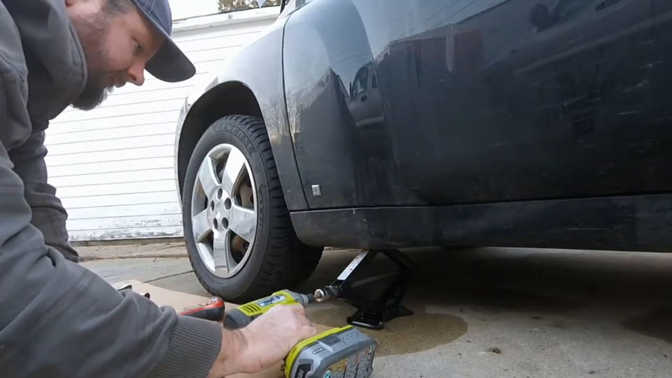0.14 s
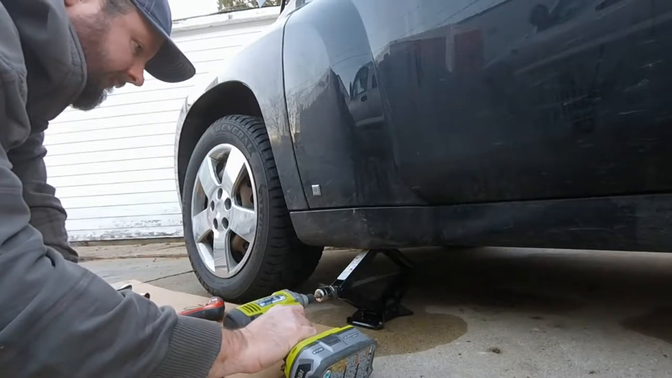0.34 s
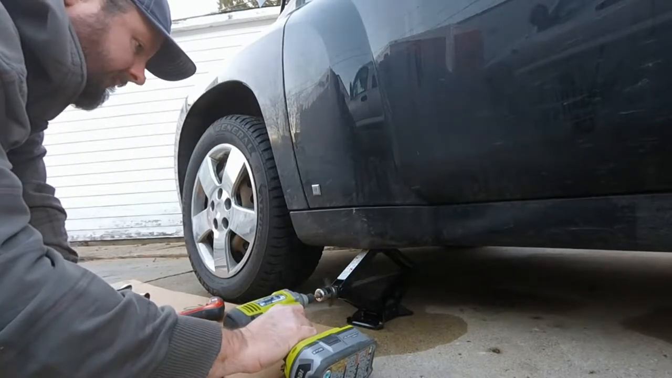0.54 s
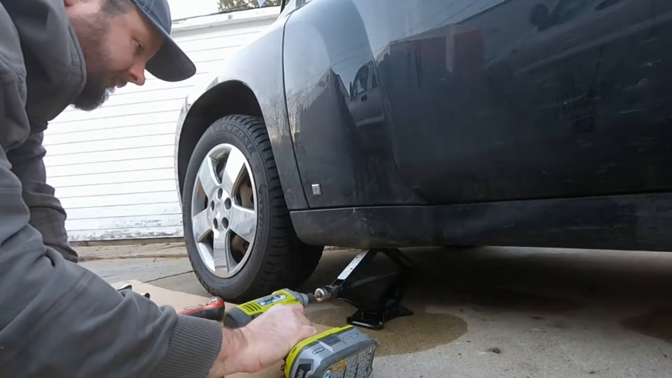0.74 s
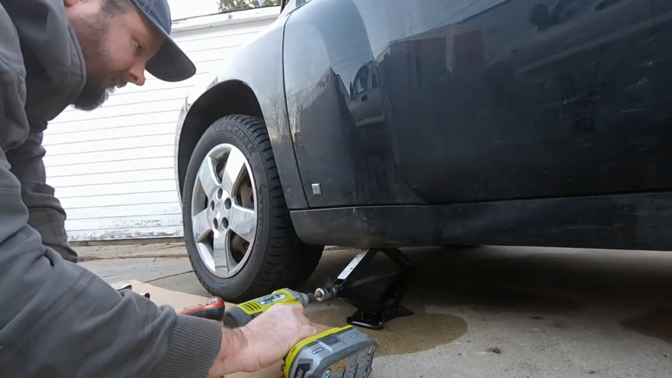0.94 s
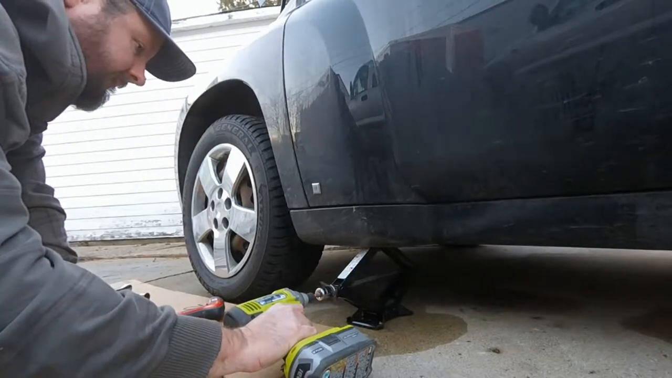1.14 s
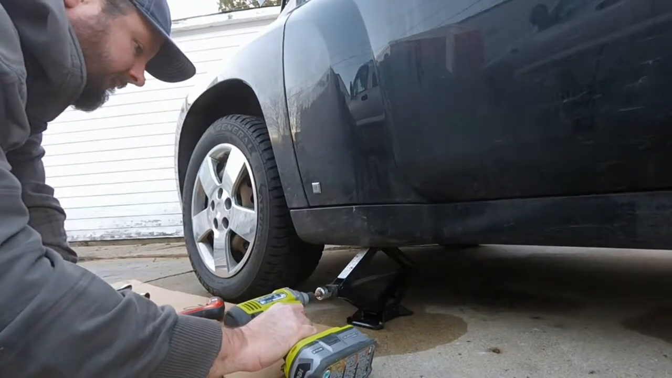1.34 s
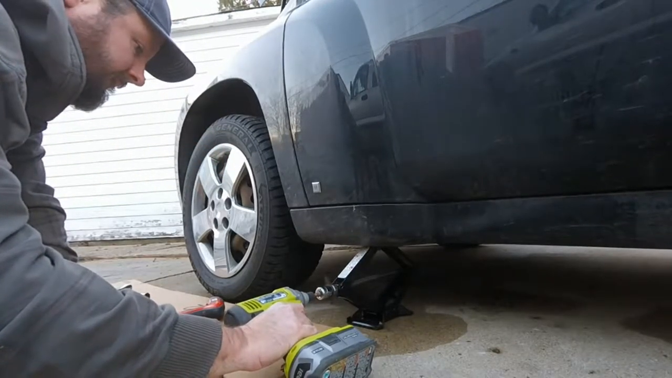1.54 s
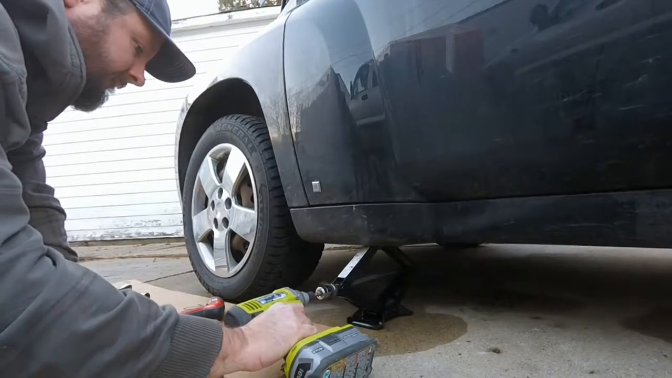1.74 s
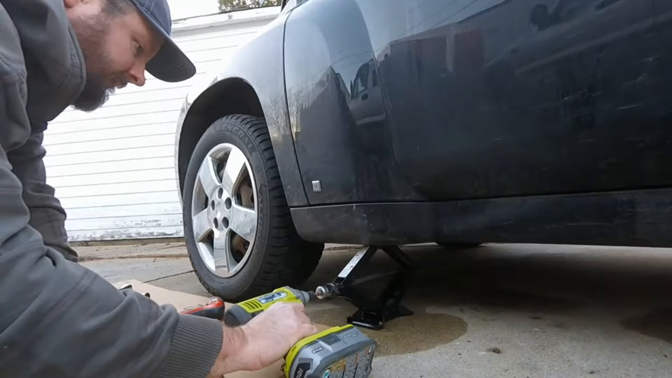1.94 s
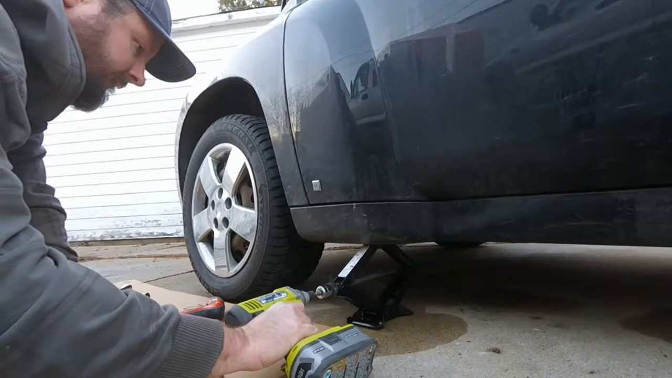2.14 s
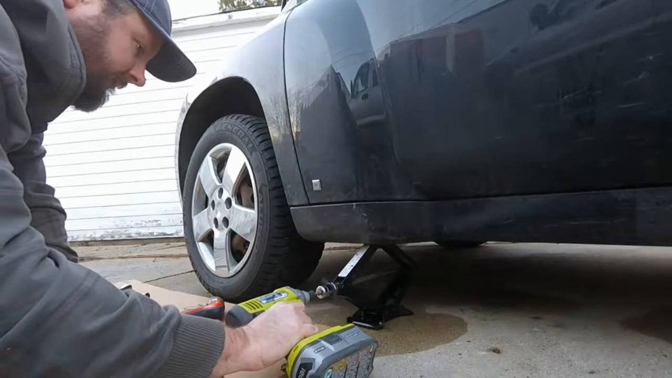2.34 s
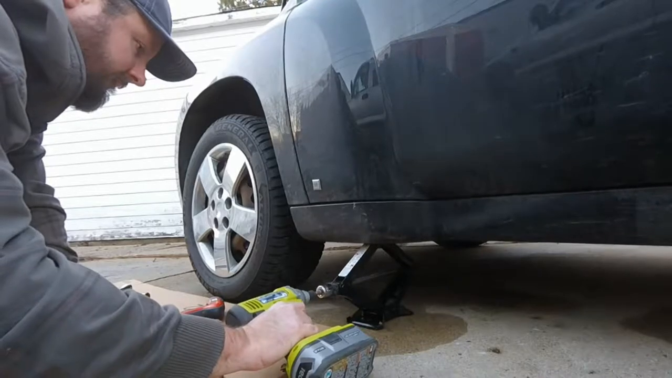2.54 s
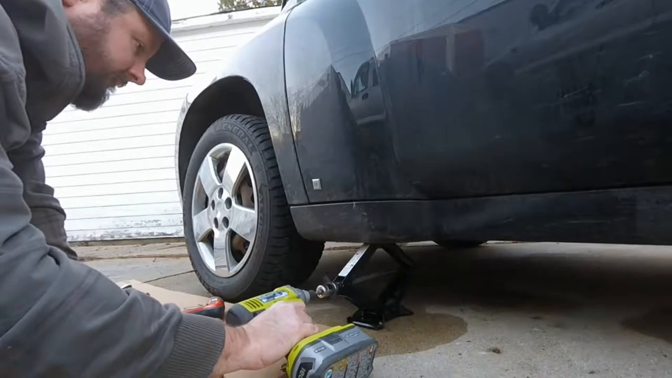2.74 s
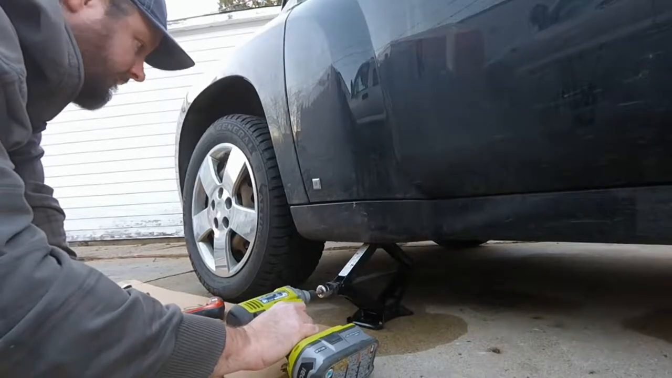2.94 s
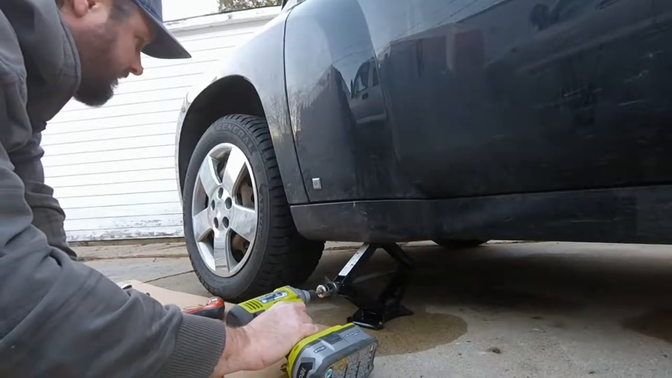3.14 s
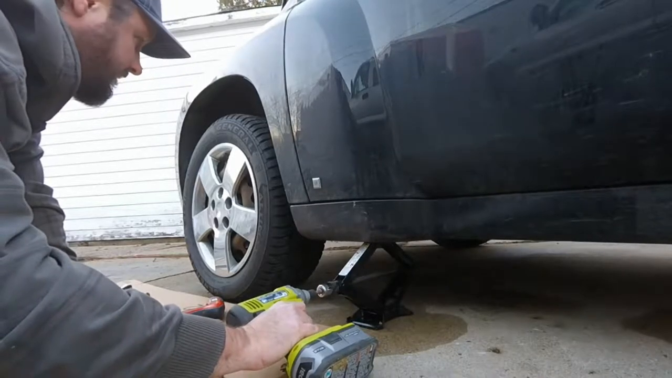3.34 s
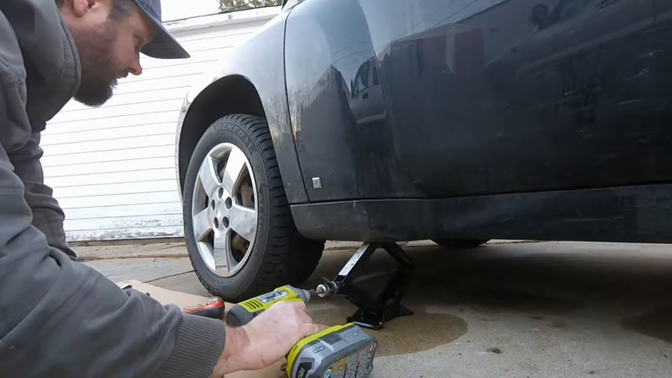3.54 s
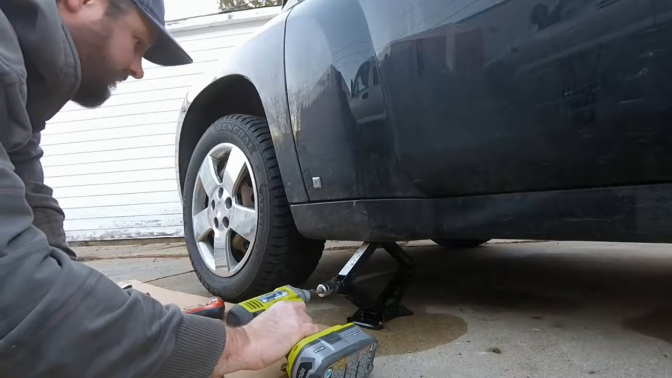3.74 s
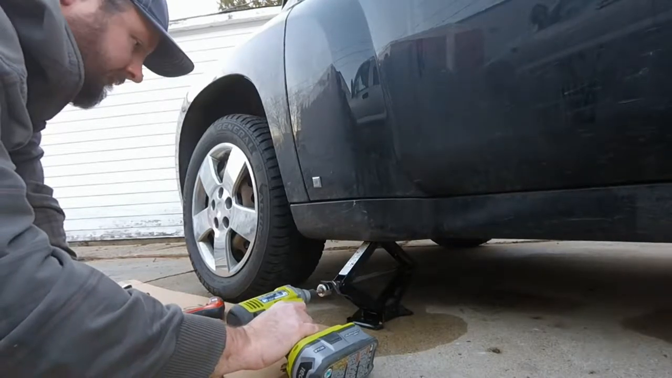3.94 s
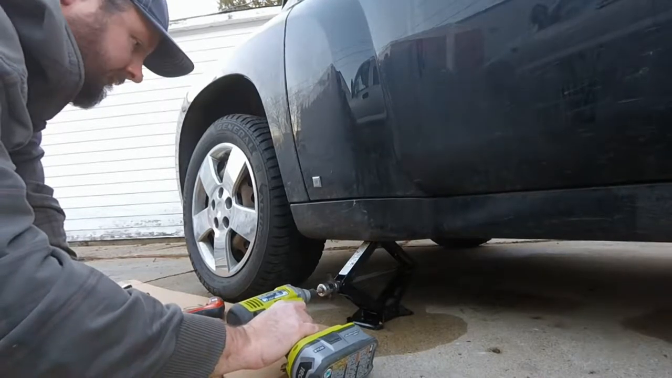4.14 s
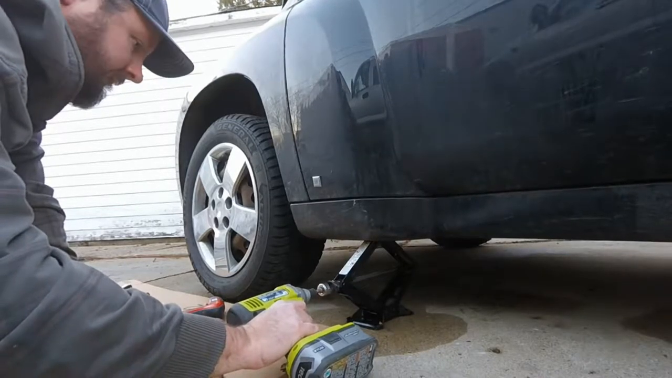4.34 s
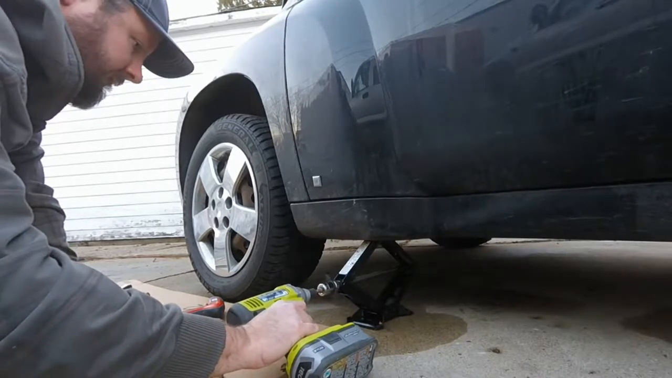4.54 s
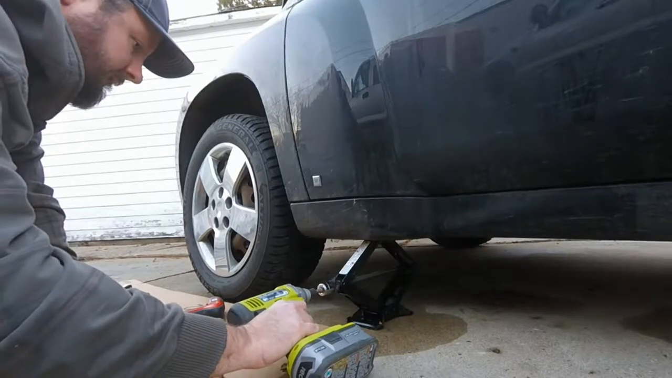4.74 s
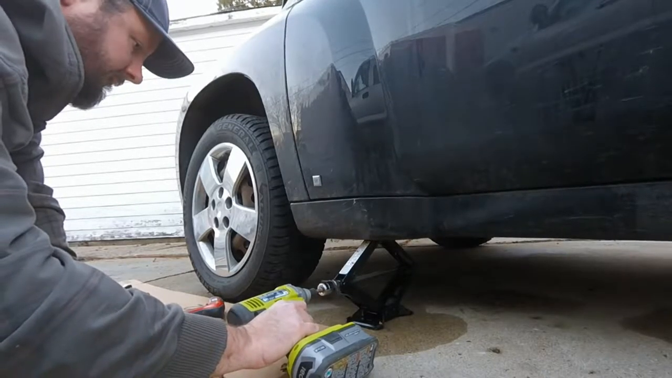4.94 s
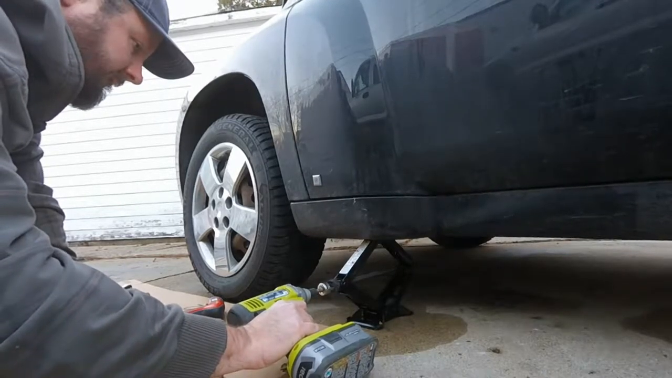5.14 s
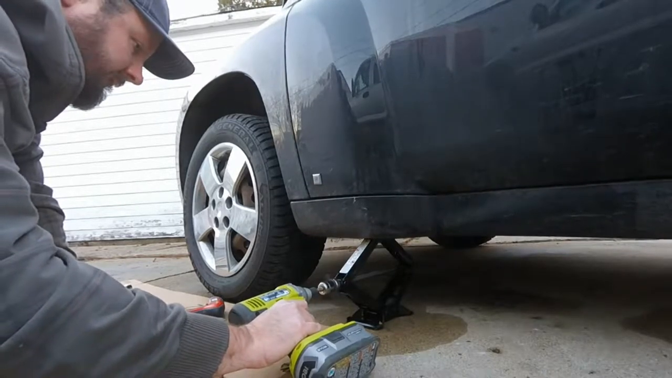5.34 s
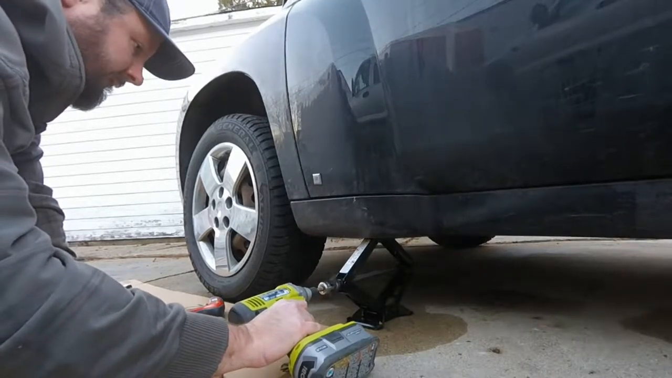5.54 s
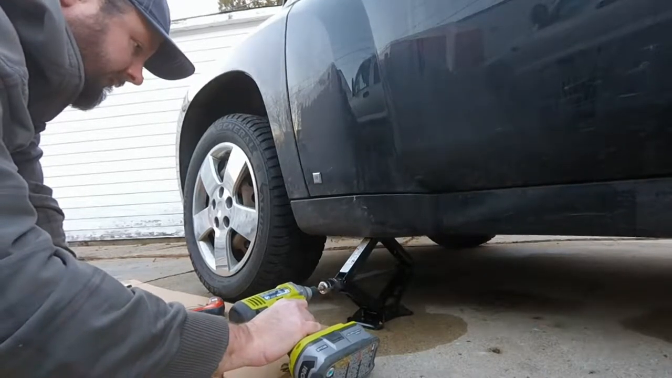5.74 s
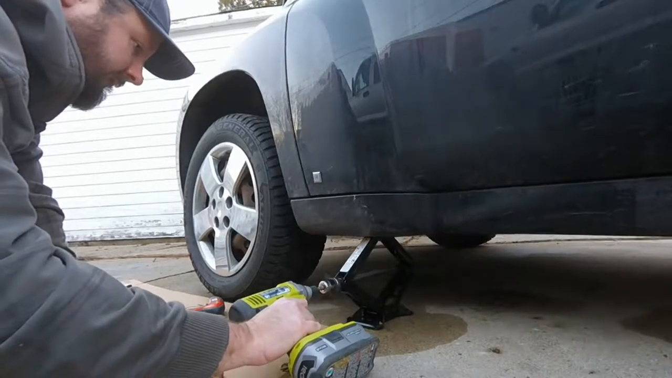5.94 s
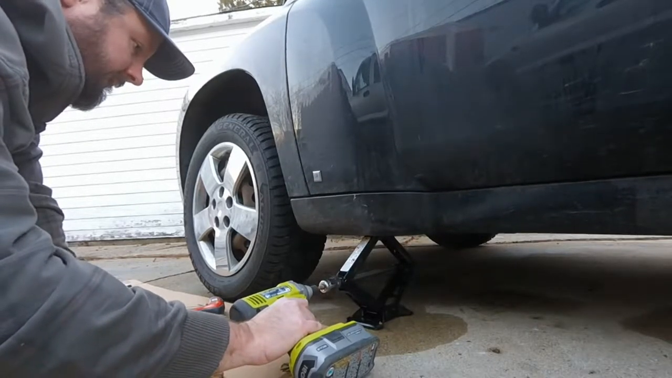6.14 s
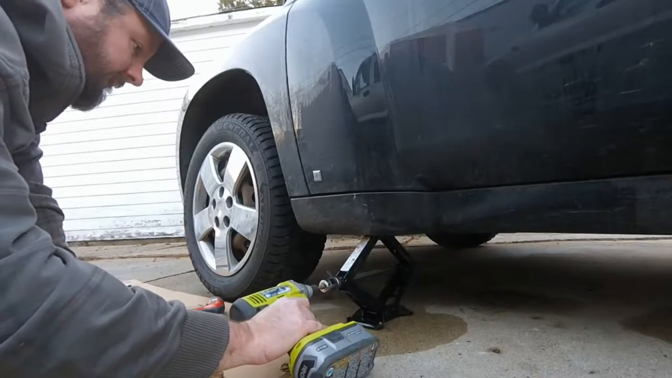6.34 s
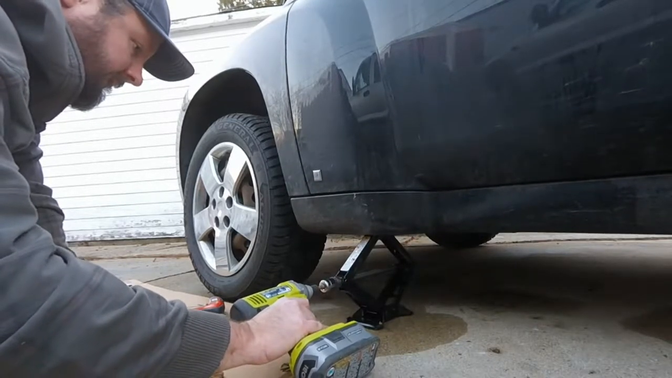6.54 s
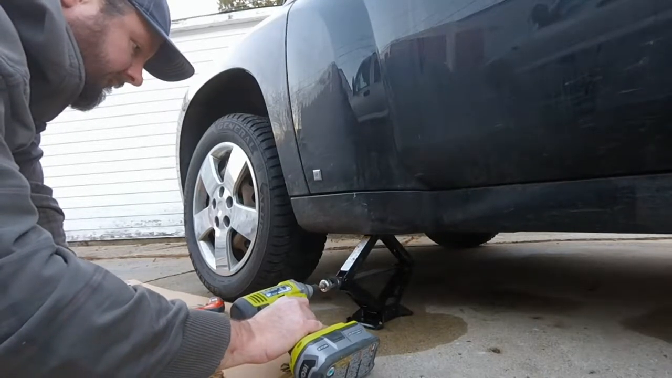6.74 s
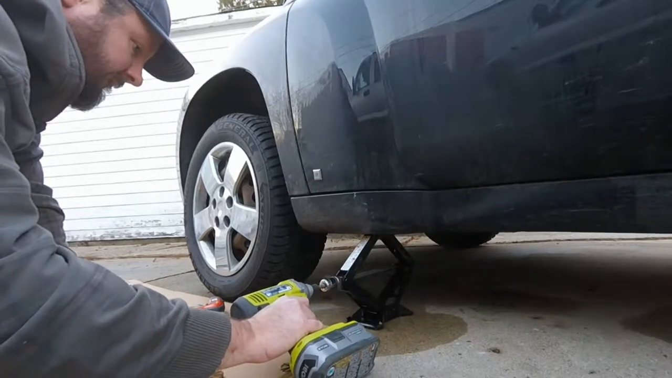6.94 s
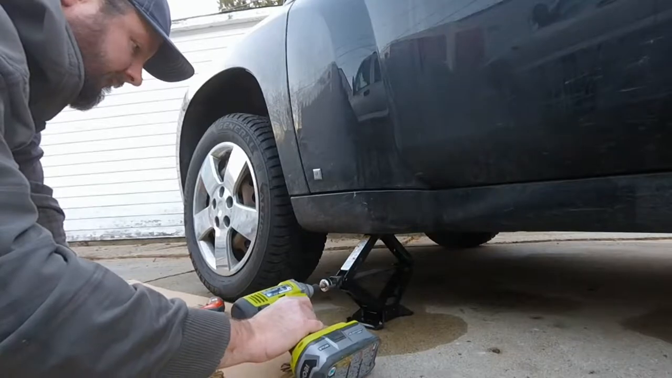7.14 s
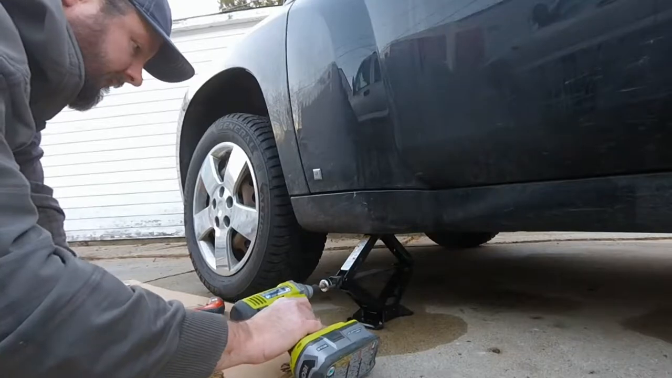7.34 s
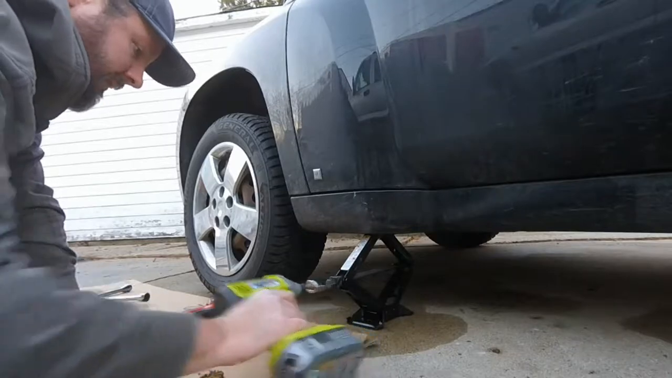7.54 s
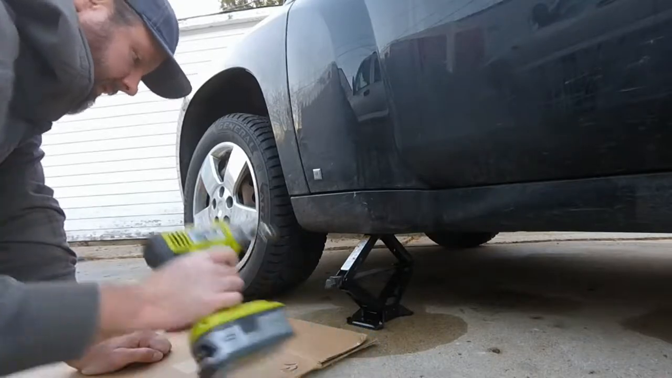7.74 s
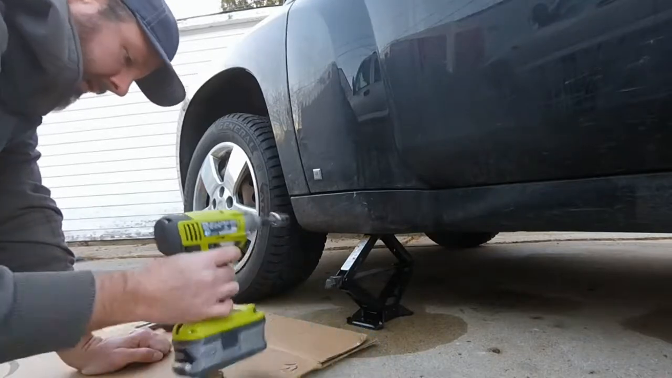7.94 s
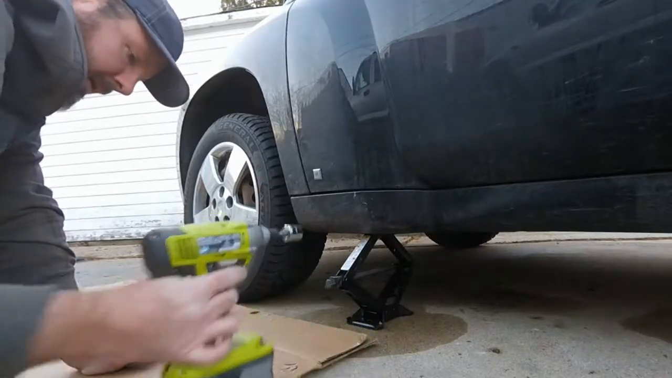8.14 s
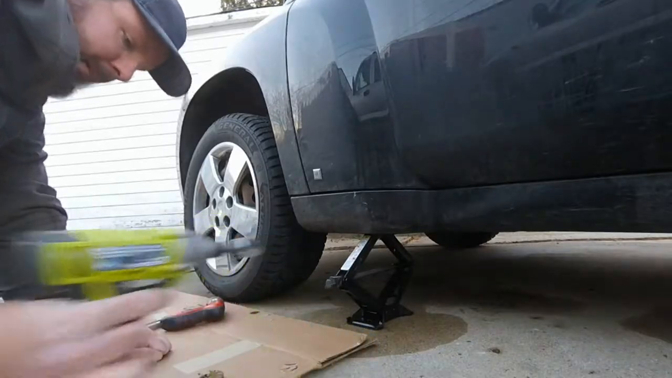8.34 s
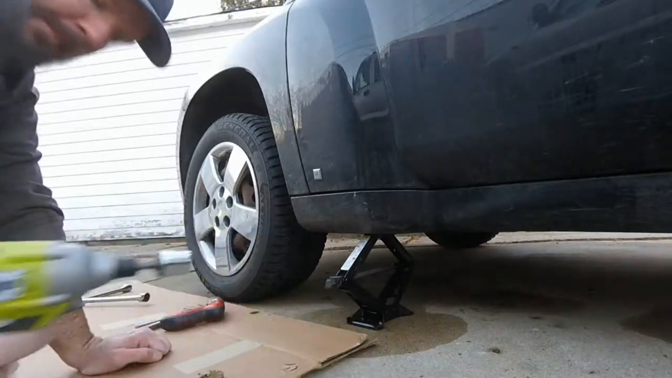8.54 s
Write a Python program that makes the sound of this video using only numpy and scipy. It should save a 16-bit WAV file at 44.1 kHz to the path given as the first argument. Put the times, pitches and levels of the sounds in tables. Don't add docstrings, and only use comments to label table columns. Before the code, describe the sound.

A cordless impact driver clacks slowly, tightens into steady metallic hammering, fires six fast rattling bursts, then stops, leaving wind thumps and faint traffic.

```python
import sys
import numpy as np
from scipy import signal
from scipy.fft import rfft, irfft
from scipy.io import wavfile
from scipy.ndimage import uniform_filter1d

SR = 44100
rng = np.random.default_rng(int(sys.argv[2]) if len(sys.argv) > 2 else 0)


def unload_audio(sound):
    columns = np.transpose(np.atleast_2d(sound))
    steps = np.round(np.clip(columns, -1, 1) * 32767)
    wavfile.write(sys.argv[1], SR, steps.astype(np.int16))


def magnitude_from_level(level_db):
    exponent = np.asarray(level_db, float) / 20
    return 10 ** exponent


N = 378819

# [t/s, level/dB]
SLOW_BLOWS = [(0.0492, -10), (0.1752, -11), (0.3002, -15), (0.4164, -12.5), (0.4899, -15.5),
              (0.5463, -13.5), (0.603, -15), (0.6555, -12), (0.7125, -14), (0.7663, -15.5), (0.821, -17.5)]
# [t/s, blows struck so far]
STEADY_RUN = [(0.8696, 0), (0.9774, 3), (1.076, 6), (1.592, 21), (1.6894, 24), (2.0531, 36), (2.2393, 42),
              (2.6276, 54), (3.3178, 75), (3.9153, 93), (4.5164, 111), (4.6188, 114), (5.1188, 129),
              (5.184, 131)]
# [t/s, level/dB, extra share reaching the jack/dB]
TICKS = [(0.005, -26, 3.5), (0.042, -20, -10), (0.124, -34, 4), (0.1606, -25.5, 4), (0.248, -40, 13),
         (0.284, -26, 0), (0.373, -26, 1), (0.4035, -23.5, 4), (0.464, -29, -24), (0.533, -22, -16),
         (6.58, -49, 7)]
# [t/s, height 0-1, ground thud/dB, sill tilt/dB per octave, sill boom/dB]
JACK_RISE = [(0, 0, 6, -1.5, 2), (.8, 0, 2.5, 6.5, 14), (.93, 0.18, 0, -7, -17), (1.55, 0.17, 13, -9, -13),
             (1.95, 0.26, -19, 7, -2.5), (2.4, 0.31, 2, 0, -3), (3, 0.48, 1, 2, -13), (3.6, 0.57, 0, 4, -4),
             (4.1, 0.68, 6, -0.5, -6.5), (4.55, 0.51, -1, 8.5, -3), (4.7, 0.8, 4, -15, -8),
             (5, 0.65, 2, -6, -19), (5.4, 0.73, -0.5, 3.5, -4), (6.1, 0.84, -2, -3, -8.5),
             (7.3, 0.84, 0.5, -2.5, -3)]
# [f/Hz, t60/s, level low/dB, level half up/dB, level high/dB]
BODY_MODES = [(32.4, 0.068, -17.5, -6, -18.5), (53, 0.15, -16, -9.5, -10), (104, 0.04, -6.5, -5, -2.5),
              (151.6, 0.11, -9.5, -8, -5.5), (218.7, 0.16, -16, -15.5, -5.5),
              (267.6, 0.18, -9.5, -16, -10.5), (329.3, 0.055, -11.5, -9, -10), (383, 0.12, -2, -3, -2.5),
              (414.3, 0.35, -8, -4.5, -13.5), (467.7, 0.41, -17, -0.5, -8.5), (534.6, 0.28, -39, -8, -6),
              (588, 0.26, -25.5, -12, -5.5), (650, 0.056, -8, -28.5, -37), (732, 0.077, -5.5, -30, -34),
              (809, 0.17, -5.5, -8.5, -8.5), (867, 0.27, -5, -4, -16), (924.3, 0.11, -1.5, -16.5, 8.5),
              (960, 0.015, 1.5, -28.5, -34), (963.5, 0.063, -5, 0.5, -15.5), (1006.5, 0.088, -1, -3, -5),
              (1055, 0.12, -22.5, -4, -7), (1144, 0.075, -10, -7.5, -8), (1192, 0.081, -13, -6.5, -7.5),
              (1387, 0.086, -20.5, -21.5, -7)]
# [f/Hz, width/Hz, level/dB]
STEEL_MODES = [(647, 295, 3.5), (1810, 900, -13), (2093, 250, -6.5), (2263, 21, -11.5), (2665, 310, -4.5),
               (2550, 42, -9.5), (3348, 310, -2), (3472, 60, -10), (3755, 220, -4.5), (4810, 130, -10.5),
               (5335, 480, -1.5), (5750, 60, -8.5), (6410, 460, -1.5), (6400, 210, -26), (7700, 300, -15),
               (10100, 920, -18.5), (11600, 1500, -11.5), (14300, 1800, -25)]
# [t/s, crack level/dB, extra push into the jack/dB]
EFFORT = [(.87, -19.5, -0.24), (1.2, -20, -1.2), (1.5, -22, 0.7), (1.9, -23, 2.5), (2.3, -21.5, -0.3),
          (3.1, -19.5, -0.5), (4.05, -18, -1), (4.5, -21.5, 1), (5.1, -17.5, -2.5), (5.4, -14, 1.3),
          (6.3, -18, 0), (6.7, -20, 1.5), (7.15, -15, -1.1)]
# [first blow t/s, let go t/s, stalled t/s, first gap longer by/s]
SQUEEZES = [
    (5.2166, 5.468, 5.63, .0105),
    (5.671, 5.862, 5.93, .0097),
    (5.9452, 6.35, 6.46, .0062),
    (6.6113, 6.712, 6.78, .0122),
    (6.8017, 6.942, 7.01, .0155),
    (7.0784, 7.18, 7.24, .0097),
]
SQUEEZE_DB = [-21.5, -21, -21.5, -22, -21.5, -20.5]
# [t/s, peak level/dB]
GUSTS = [
    (7.27, -30),
    (7.364, -20),
    (7.552, -17.5),
    (7.634, -17.5),
    (7.816, -27.5),
    (7.974, -26.5),
    (8.03, -24),
    (8.092, -24.5),
    (8.156, -23),
    (8.31, -32),
]
# [t/s, level/dB]
TRAFFIC_LEVEL = [
    (7.35, -66.5),
    (7.538, -69),
    (7.894, -63.5),
    (8.59, -64),
]
# [f/Hz, level/dB]
TRAFFIC_COLOUR = [(53, -27.5), (90, 1), (368, -15), (561, -18), (891, -13), (1160, -25), (1280, -32),
                  (2340, -36.5), (4110, -41), (5440, -41.5), (7070, -47.5), (11000, -53), (14300, -70),
                  (22000, -120)]
# [t/s, click level/dB, hollow level/dB]
GRIP_KNOCKS = [
    (7.575, -59, -65),
    (7.588, -58, -65),
    (7.603, -46, -51),
    (8.2518, -40, -39),
]
# [f/Hz, t60/s, level/dB]
GRIP_MODES = [(567, 0.046, 3.5), (705, 0.029, 3), (867, 0.033, 2.5), (1030, 0.045, -3), (1330, .03, -14)]

SCATTER_DB = 1
REBOUND_T60_S = 0.023
SILL_BOTTOM_HZ = 700


def ring(x, hz, t60):
    pole = np.exp(2j * np.pi * hz / SR - np.log(1000) / (t60 * SR))
    return signal.lfilter([1], [1, -pole], x).imag


def band(x, hz, width_hz):
    return signal.lfilter(*signal.iirpeak(hz, hz / width_hz, fs=SR), x)


def fade(x, t60):
    return signal.lfilter([1], [1, -np.exp(-np.log(1000) / (t60 * SR))], x)


def spikes(times, sizes):
    return np.bincount((times * SR).astype(int), sizes, N)[:N]


def curve(rows):
    return magnitude_from_level(np.interp(np.arange(N) / SR, *np.transpose(rows)))


def unit(x):
    return x / np.sqrt(np.mean(x ** 2))


def motor():
    creep_db, part_db, loaded_db, full_db, wake_db = -44, -38, -29.5, -28.5, -45.5
    spin_up_s, spin_down_db_per_s = 0.034, -250
    standstill_s, wake_s = .23, .033
    rows = [(0, creep_db), (SLOW_BLOWS[3][0], creep_db)]
    rows += [(STEADY_RUN[1][0], part_db), (STEADY_RUN[-1][0], loaded_db)]
    next_squeezes = [*SQUEEZES[1:], (N / SR,)]
    for (start, let_go, *_), (after, *_) in zip(SQUEEZES, next_squeezes):
        rows += [(start + spin_up_s, full_db), (let_go, full_db)]
        wake = after - wake_s * (after - let_go > standstill_s)
        rows += [(wake, full_db + spin_down_db_per_s * (wake - let_go))]
        if wake < after < N / SR:
            rows += [(wake + 1 / SR, wake_db)]
    return curve(rows)


def blows():
    lug_db = 0.2
    fast_scatter_db = 3
    slow_s, slow_db = np.transpose(SLOW_BLOWS)

    at, struck = np.transpose(STEADY_RUN)
    number = np.arange(struck[-1] + 1)
    run_s = np.interp(number, struck, at)
    run_db = np.interp(run_s, *np.transpose(EFFORT)[:2]) + lug_db * (-1) ** number
    run_db = run_db + SCATTER_DB * rng.standard_normal(len(number))

    bursts = [squeeze(*row) for row in SQUEEZES]
    fast_s = np.concatenate([s for s, db in bursts])
    fast_db = np.concatenate([db for s, db in bursts])
    which = np.searchsorted(np.transpose(SQUEEZES)[0], fast_s, "right") - 1
    fast_db = fast_db + np.take(SQUEEZE_DB, which)
    chance = rng.standard_normal(N // 400)[(fast_s * SR / 400).astype(int)]
    fast_db = fast_db + fast_scatter_db * chance
    return np.r_[slow_s, run_s, fast_s], np.r_[slow_db - 7, run_db, fast_db]


def steel(hard, light):
    crack_s, crack_db, rattle_t60_s, contact_s = 0.00098, 0.5, 0.066, .0012
    grain_db, colour_scatter_db = 1, 1.6
    treble_damping, gear_tilt_db, light_tilt_db = 0.11, -3, -3
    grains = magnitude_from_level(grain_db * np.repeat(rng.standard_normal(N // 40 + 1), 40)[:N])
    gears = motor()
    out = 0
    for hz, width_hz, db in STEEL_MODES:
        pitch = hz / 4000
        octaves = np.log2(pitch)
        short = pitch ** -treble_damping
        colour = magnitude_from_level(colour_scatter_db * np.repeat(rng.standard_normal(N // 400 + 1), 400)[:N])
        blow = hard * colour
        knock = light * colour * magnitude_from_level(light_tilt_db * octaves)
        crack = fade((magnitude_from_level(crack_db) * (blow + knock)) ** 2, crack_s * np.log(1000))
        rattle = fade(blow ** 2, rattle_t60_s * short)
        clicks = fade(knock ** 2, REBOUND_T60_S * short)
        power = np.abs(uniform_filter1d(crack + rattle + clicks, size=int(contact_s * SR)))
        hiss = gears * magnitude_from_level(gear_tilt_db * octaves)
        push = np.sqrt(power * grains ** 2 + hiss ** 2)
        level = magnitude_from_level(db) * np.sqrt(SR / width_hz / 20)
        out = out + level * band(push * rng.standard_normal(N), hz, width_hz)
    return out


def body(times, db):
    travel_s, screw_play_s, joint_play_s = .009, .00013, .00012
    load_low_db, load_high_db, sill_db, body_scatter_db = 4, -1.5, -3, 1.7
    sill_centre_hz, boom_t60_s, longest_t60_s = 940, .06, .24
    ground_top_hz, arms_hz, shake_db = 45, 300, -29

    s, *columns = np.transpose(JACK_RISE)
    height, ground_db, tilt_db, boom_db = (np.interp(times, s, c) for c in columns)
    load_db = load_low_db + (load_high_db - load_low_db) * height
    load_db = load_db + np.interp(times, *np.transpose(EFFORT)[::2])
    slot = (times * SR / 100).astype(int)
    chance = rng.standard_normal((N // 100, len(BODY_MODES), 2))[slot]
    to_arrival = np.arange(-travel_s * SR, travel_s * SR / 4) / SR
    climb = np.minimum(1 + to_arrival / travel_s, 1 - 4 * to_arrival / travel_s) ** 1.1
    shake = magnitude_from_level(shake_db) * motor() * rng.standard_normal(N)
    raised = np.interp(np.arange(N) / SR, s, columns[0])
    out = 0
    for k, (hz, t60, *by_height) in enumerate(BODY_MODES):
        scatter_db = body_scatter_db * min(hz / 600, 1) * chance[:, k, 0]
        if hz < ground_top_hz:
            part_db = ground_db
        elif hz <= SILL_BOTTOM_HZ:
            part_db = 0
        elif t60 < boom_t60_s:
            part_db = sill_db + boom_db
        else:
            part_db = sill_db + tilt_db * np.log2(hz / sill_centre_hz)
        mode_db = np.interp(height, [0, .5, 1], by_height)
        size = magnitude_from_level(db + load_db + part_db + mode_db + scatter_db)
        play_s = screw_play_s * chance[:, 0, 1] + joint_play_s * chance[:, k, 1]
        hit = spikes(np.abs(times + play_s), size)
        if arms_hz < hz < SILL_BOTTOM_HZ:
            hit = hit + shake * np.interp(raised, [0, .5, 1], magnitude_from_level(np.array(by_height)))
        swell = climb * np.cos(2 * np.pi * hz * to_arrival) / climb.sum()
        side = 1 if hz > SILL_BOTTOM_HZ else (-1) ** k
        push = signal.oaconvolve(hit, swell)[:N]
        out = out + side * ring(push, hz, min(t60, longest_t60_s))
    return magnitude_from_level(11.5) * out


def driver():
    rebound_s, rebound_spread_s, rebound_db, rebound_body_db = .0245, .0006, -8.5, -8.5
    s, db = blows()
    chance = rng.standard_normal((2, N // 100))[:, (s * SR / 100).astype(int)]
    back_s = s + rebound_s + rebound_spread_s * chance[0]
    back_db = db + SCATTER_DB * chance[1]
    tick_s, tick_db, share_db = np.transpose(TICKS)
    tick_db = tick_db - 10.5
    light = spikes(back_s, magnitude_from_level(back_db + rebound_db)) + spikes(tick_s, magnitude_from_level(tick_db))
    push_db = uniform_filter1d(db, size=3, mode="nearest")
    knocks_db = np.r_[push_db, push_db + rebound_body_db, tick_db + share_db]
    return steel(spikes(s, magnitude_from_level(db)), light) + body(np.r_[s, back_s, tick_s], knocks_db)


def squeeze(start, let_go, stalled, lag):
    full_gap_s, catch_up, coast_s, coast_growth = .0185, .3, .0032, 2.2
    weak_db_per_s, coast_db_per_s, weakest_db = -450, -280, -4.5
    s, extra = [start], [lag]
    while s[-1] + full_gap_s + extra[-1] < stalled:
        s.append(s[-1] + full_gap_s + extra[-1])
        if s[-1] > let_go:
            extra.append(coast_s)
            coast_s *= coast_growth
        else:
            extra.append(extra[-1] * catch_up)
    slope = np.where(np.array(s) > let_go, coast_db_per_s, weak_db_per_s)
    return s, np.maximum(slope * extra, weakest_db)


def wind():
    rumble_hz, width_hz, calm_db = 39.8, 16, -41
    rise_db_per_s, fall_db_per_s = 196, 172
    gust = band(band(rng.standard_normal(N), rumble_hz, width_hz), rumble_hz, 3 * width_hz)
    t = np.arange(N) / SR
    db = np.full(N, float(calm_db))
    for s, peak_db in GUSTS:
        below_peak_db = np.maximum(rise_db_per_s * (s - t), fall_db_per_s * (t - s))
        db = np.maximum(db, peak_db - below_peak_db)
    return unit(gust) * magnitude_from_level(db)


def traffic():
    hz, db = np.transpose(TRAFFIC_COLOUR)
    f = np.arange(N // 2 + 1) * SR / N + 1
    colour = magnitude_from_level(np.interp(np.log(f), np.log(hz), db))
    hum = irfft(rfft(rng.standard_normal(N)) * colour, N)
    return unit(hum) * curve(TRAFFIC_LEVEL) * magnitude_from_level(19.0)


def grip():
    click_hz, click_t60_s, push_s = 3400, 0.11, 0.00092
    s, click_db, hollow_db = np.transpose(GRIP_KNOCKS)
    click = fade(spikes(s, magnitude_from_level(click_db)), click_t60_s) * rng.standard_normal(N)
    knock = spikes(s, magnitude_from_level(hollow_db))
    hollow = 0
    for k, (hz, t60, db) in enumerate(GRIP_MODES):
        hollow = hollow + (-1) ** k * magnitude_from_level(db) * ring(knock, hz, t60)
    hollow = band(band(hollow, 800, 1 / push_s), 830, 1 / push_s)
    scuff = band(click, click_hz, 900)
    scuff = scuff + magnitude_from_level(-29.0) * band(click, 5700, 1500) + magnitude_from_level(-2.0) * band(click, 2400, 500)
    return magnitude_from_level(9.0) * hollow + scuff


def scene():
    return (driver() + wind() + traffic() + grip())[None]


def low_pass(x):
    return signal.sosfilt(signal.butter(12, 16270, fs=SR, output="sos"), x)


def record(dry):
    limit = .9
    rounded = limit * np.tanh(dry / limit)
    low_cut = signal.butter(2, 16, "highpass", fs=SR, output="sos")
    high_cut = signal.cheby2(8, 45, 16000, fs=SR, output="sos")
    mix = signal.sosfilt(high_cut, signal.sosfilt(low_cut, rounded))
    return low_pass(mix)


dry = scene()
out = record(dry)
unload_audio(out)
```